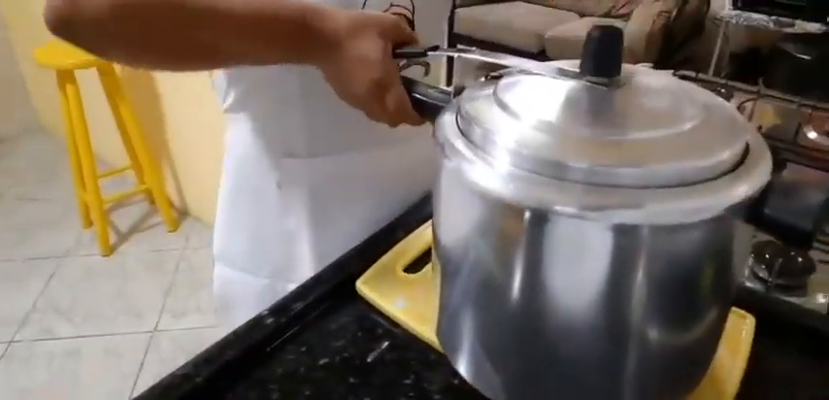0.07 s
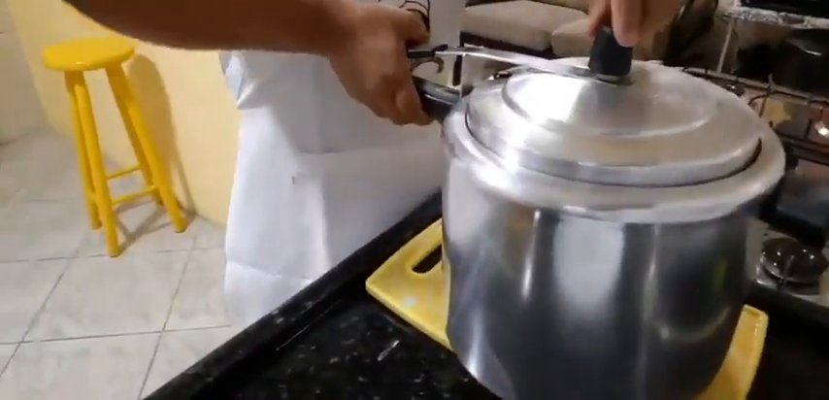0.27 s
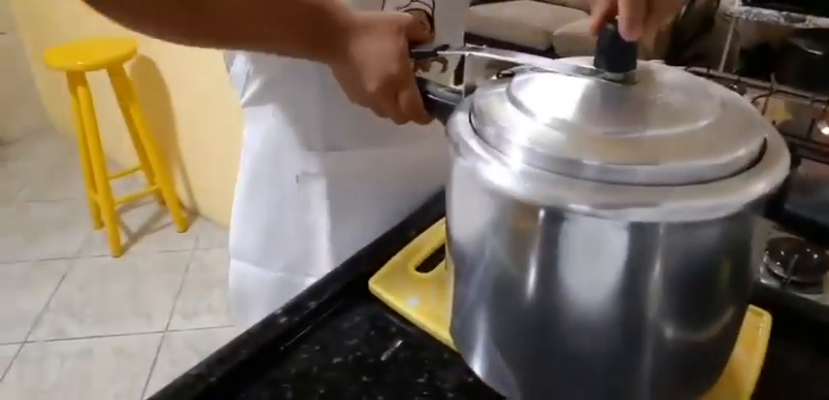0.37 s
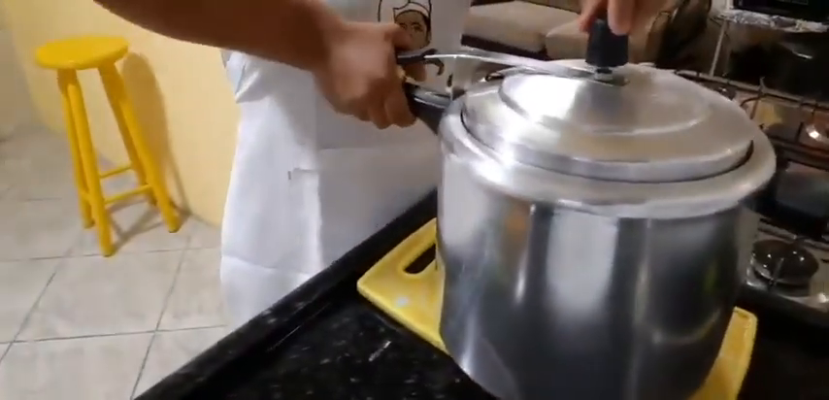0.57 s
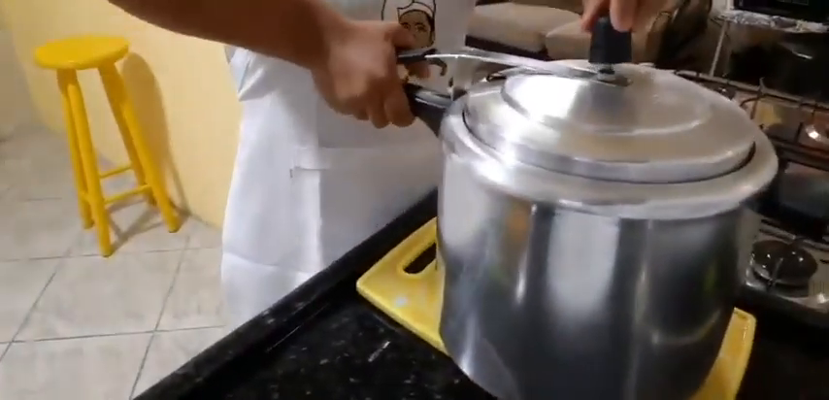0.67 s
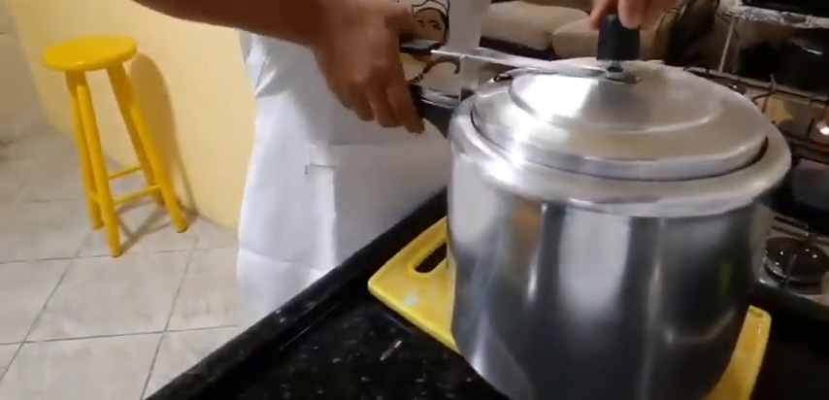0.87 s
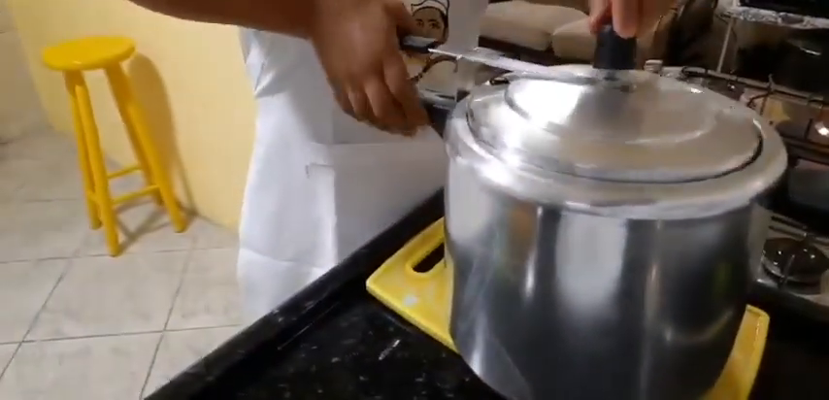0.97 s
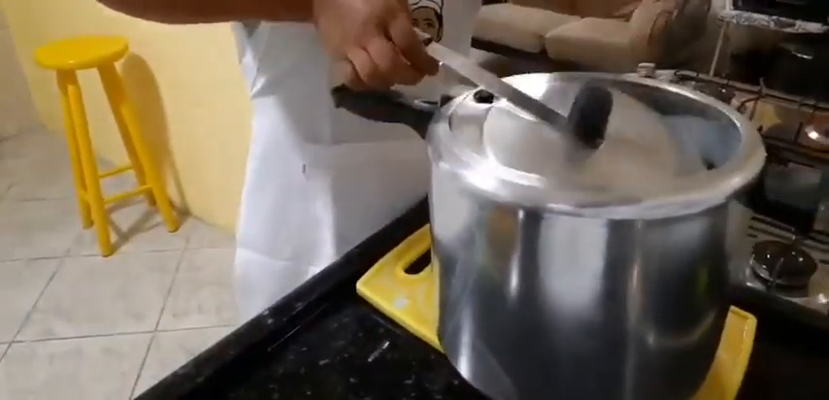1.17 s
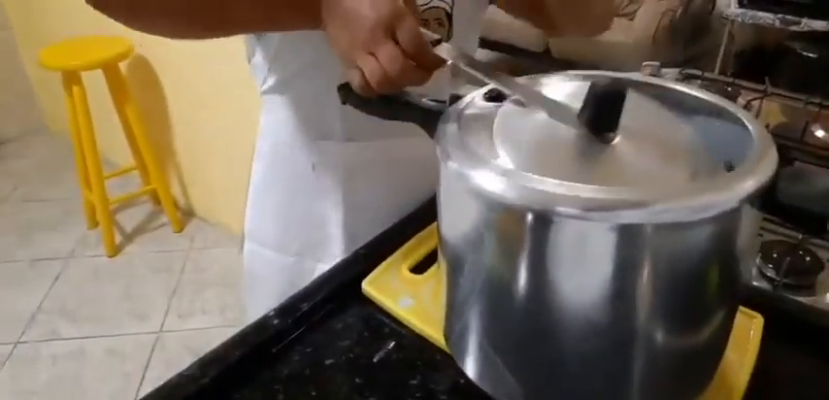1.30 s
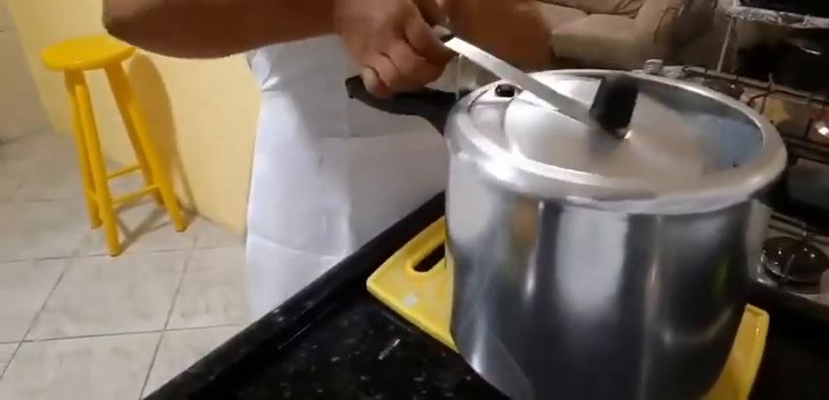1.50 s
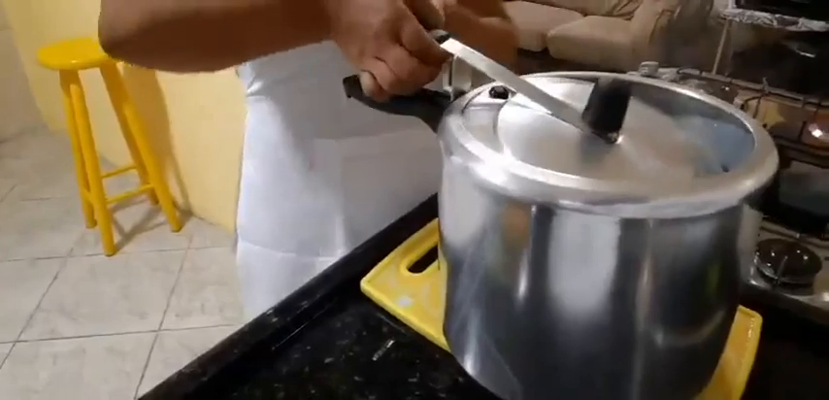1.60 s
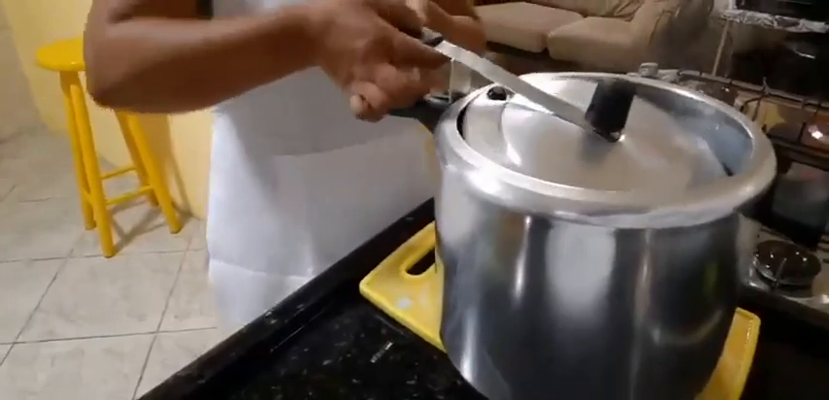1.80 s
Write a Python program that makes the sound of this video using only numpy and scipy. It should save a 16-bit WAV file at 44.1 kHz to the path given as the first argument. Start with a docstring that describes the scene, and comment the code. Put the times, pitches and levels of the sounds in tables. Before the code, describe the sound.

A metal pressure cooker lid rattles loose, scrapes and clanks against the pot.

```python
"""Over a faint rumble, the sprung lever of an aluminium pressure cooker rattles and snaps off its catch.
The rubber gasket ticks as it unsticks, and the freed lid scrapes round under the rim in tiny slips.
The lid then bumps the pot wall and drops against it with a clank. Each blow makes the metal ring
at its own natural pitches (its modes), and the tiled kitchen echoes after it."""
import sys
import numpy as np
from scipy import signal
from scipy.fft import rfft, irfft, next_fast_len
from scipy.io import wavfile

SR = 44100
rng = np.random.default_rng(int(sys.argv[2]) if len(sys.argv) > 2 else 0)


def file_out(sig):
    """Save sig as 16-bit WAV at sys.argv[1]."""
    # one column per channel
    cols = np.atleast_2d(sig).T
    # limit, then scale
    lim = np.clip(cols, -1, 1)
    pcm = np.round(lim * 32767).astype(np.int16)
    wavfile.write(sys.argv[1], SR, pcm)


N = 81585

# Table levels are relative. A fade time (t60) is how long a sound takes to drop by 60 dB.
# blows: (time [s], level [dB], bass [dB], treble [dB], rise time [s])
LEVER_KNOCKS = [(.036, -31, 11, -28, 0.0008), (.182, -22.5, 11, 3.5, 0.0067), (.192, -6, 5.5, -11, 0.0035),
                (.225, -12.5, 14, -10.5, 0.0013), (.247, -6.5, 6, -9, 0.0034), (.274, -4, 0.5, -9, 0.0048),
                (.3045, -1.5, 0, -5, 0.0045), (.318, -8, -10, 2, 0.0031), (.3315, 3.5, 3, -2, 0.0016),
                (.353, -10.5, 7, -23, 0.009), (.391, -5.5, -2, -22, 0.0084), (.486, -13, -12, -14, 0.0041),
                (.619, -17, -13.5, -18.5, 0.002), (.626, -24, -6, -20.5, 0.0026),
                (.773, -33.5, 1, -3, 0.0029)]
LID_CLANKS = [(1.164, -19.5, -2, -2, 0.0015), (1.226, -21.5, -4.5, -13, 0.0013),
              (1.254, -31.5, 6, -18, 0.001), (1.425, -10.5, 5, 6, 0.0082), (1.4405, -0.5, 5, 3, 0.0014),
              (1.4555, -0.5, -9, -7, .001), (1.493, -15, -23, 11.5, 0.0029), (1.510, -17, 20, -8, 0.0056),
              (1.558, -7.5, -7, -16.5, .003), (1.655, -22.5, 1.5, -17, 0.0037)]
WALL_BUMPS = [(1.324, -19, 0, 9.5, .006), (1.344, -10, 2.5, -7.5, 0.0089), (1.385, -21, 2, -23, 0.01)]
# rubber unsticking: (time [s], level [dB], pitch [Hz], fade time [s])
GASKET_TICKS = [(0.807, -47.5, 378, 0.14), (0.849, -36.5, 317, 0.053), (0.896, -37.5, 1660, 0.024),
                (0.928, -35, 1620, .015), (.953, -36, 1610, 0.0053)]
# how hard the lid rubs under the rim: (time [s], level [dB])
RUBBING = [(.78, -100), (.84, -58.5), (.953, -61.5), (.965, -24), (.979, -18), (.992, -34), (1.042, -33.5),
           (1.053, -19.5), (1.068, -50), (1.145, -41.5), (1.168, -33), (1.21, -50.5), (1.25, -53),
           (1.275, -59), (1.34, -82), (1.40, -97)]
# the metal's strong modes: (pitch [Hz], level [dB], fade time [s])
SHUT_POT_MODES = [(293, -27, .28), (345, -29, .2), (1378, -35, .5), (1545, -35, .45), (2040, -41, .45),
                  (2347, -42, .35), (5080, -37, .3), (5830, -44, .3), (6210, -43, .3), (7600, -47, .22),
                  (1341, -30, .48), (1997, -31, .45), (2905, -34, .38), (3284, -32, .45), (4453, -31, .42),
                  (4975, -30, .32)]
SCRAPE_MODES = [(127, -10, 0.84), (519.6, -9.5, 0.073), (658, -17, 0.26), (1355, -7.5, 0.33),
                (1516, -16, 0.15), (1752, -17, 0.067), (1993, -7.5, 0.64), (2930, -3, 0.15),
                (3690, 5.5, 0.05), (3790, -6, 0.073), (4270, 2, 0.071), (5130, -8, 0.11), (6030, -31, 0.31)]
LOOSE_LID_MODES = [(245, -24, .12), (279, -24, .28), (1280, -34, .3), (2036, -37, .4), (3225, -36, .36),
                   (3945, -36, .3), (4200, -39, .3), (4400, -37, .3), (6690, -43, .3), (7230, -44, .3),
                   (1850, -33, .45), (2685, -21, .6), (2733, -28, .52), (2827, -34, .45), (3640, -33, .42),
                   (3681, -33, .35), (5290, -29, .33)]
WALL_MODES = [(482.4, -19, .25), (614.5, -35.5, 0.73), (1125, -56, 0.25), (1346, -24, 0.38),
              (1560, -37, 0.21)]
# its crowded modes, which blur into noise: (frequency [Hz], level [dB])
SHUT_POT_SPECTRUM = [(30, -18), (100, -3), (220, -2.5), (310, 2.5), (450, 1), (640, 6), (900, 0),
                     (1050, -1.5), (1300, 4.5), (1750, 0.5), (3200, 2), (5500, -6.5), (8500, -14.5),
                     (11500, -11.5), (16000, -25.5)]
SCRAPE_SPECTRUM = [(30, -16.5), (120, -3), (210, 5), (350, 3.5), (520, 0.5), (700, -5), (850, -8),
                   (1060, -31), (1350, 1.5), (2400, 3.5), (4000, 0), (7500, -2), (8600, -2), (10500, -0.5),
                   (16000, -5)]
LOOSE_LID_SPECTRUM = [(30, -10), (100, -7.5), (180, 0.5), (280, -11.5), (370, 0.5), (650, 5), (1020, -1.5),
                      (1300, 6.5), (2300, 2), (3800, 3.5), (7000, -6), (9000, -8.5), (16000, -17.5)]
WALL_SPECTRUM = [(30, -21), (140, 9), (330, 2.5), (600, 7.5), (950, 0), (1400, 6), (2000, 4.5), (5000, -3),
                 (9000, -12), (16000, -17)]
# background noise: (frequency [Hz], level [dB])
RUMBLE_SPECTRUM = [(25, -20), (55, 5.5), (85, -11), (120, 2), (170, -13), (300, -13.5), (650, -14.5),
                   (1000, -27.5), (2000, -18.5), (5000, -26.5), (8000, -39.5), (16000, -30)]
# the kitchen's echo: (frequency [Hz], fade time [s])
ROOM_T60 = [(60, 0.55), (200, 0.69), (1000, 0.45), (3000, 0.44), (8000, 0.44), (16000, 0.4)]
# how alike left and right sound: (frequency [Hz], likeness [0 to 1])
ROOM_LIKENESS = [(60, 1), (280, 0.71), (600, 0.38), (1500, 0.3), (4000, 0.22), (16000, 0.2)]

BASS_HZ, TREBLE_HZ = 594, 3240
TWIN_GAP_HZ, TWIN_GAIN = 12.97, 0.72   # each mode's gap is this times a random factor
PEAK_DB, PEAK_WIDTH = 8, 0.021   # lift round each mode; half-width as a share of its pitch
CRASH_DB, CRASH_T60_S = -17, .09
CRACK_OVER_CRASH_DB, CRACK_T60_S = 10.5, .022
SLIPS_PER_S, SLIP_SPREAD_DB, SCRAPE_RING_DB = 3500, 4, -19.5
ROOM_GAP_S, LEFT_LAG_S = 0.0046, .00016
PAN_DB, PAN_ABOVE_HZ = 0.95, 160   # the lean to the left fades in the bass
RUMBLE_DB, CUTOFF_HZ = -59, 15800
TIME = np.arange(N) / SR
FFT_SIZE = next_fast_len(2 * N, real=True)
HZ = np.maximum(np.arange(FFT_SIZE // 2 + 1) * SR / FFT_SIZE, 1)


def from_db(db):
    """Turn decibels into a gain."""
    return 10 ** (np.asarray(db) / 20)


def rms_one(x):
    """Scale a sound to an average (rms) level of one."""
    return x / np.sqrt(np.mean(x ** 2) + 1e-20)


def at_hz(points, hz):
    """Read between a table's rows on a log-frequency axis."""
    freqs, values = np.transpose(points)
    return np.interp(np.log(hz), np.log(freqs), values)


def colour(x, curve_db):
    """Turn each frequency up or down without smearing sound back in time (minimum phase)."""
    cepstrum = irfft(np.log(from_db(curve_db)), FFT_SIZE)
    cepstrum[1:FFT_SIZE // 2] *= 2
    cepstrum[FFT_SIZE // 2 + 1:] = 0
    return irfft(rfft(x, FFT_SIZE) * np.exp(rfft(cepstrum)), FFT_SIZE)[..., :N]


def dying(t60):
    """A fade that drops 60 dB in t60 seconds."""
    return np.exp(-np.log(1000) * TIME / t60)


def delayed(x, start_s):
    """Start a sound later."""
    start = int(np.clip(start_s * SR, 0, N - 1))
    silence = np.zeros(x.shape[:-1] + (start,))
    return np.concatenate([silence, x[..., :N - start]], axis=-1)


def room_noise():
    """Stereo noise whose sides are alike in the bass and mostly unrelated in the treble."""
    mid, side = rfft(rng.standard_normal((2, FFT_SIZE)))
    alike = np.clip(at_hz(ROOM_LIKENESS, HZ), -.99, .99)
    shared = np.sqrt((1 + alike) / 2) * mid
    opposed = np.sqrt((1 - alike) / 2) * side * [[1], [-1]]
    return irfft(shared + opposed, FFT_SIZE)[:, :N]


def rumble():
    """Faint, steady background noise, strongest in the bass."""
    return from_db(RUMBLE_DB) * rms_one(colour(room_noise(), at_hz(RUMBLE_SPECTRUM, HZ)))


def ringing(hz, t60):
    """A mode and its slightly higher twin drift in and out of step, so the ring wobbles."""
    main = np.sin(2 * np.pi * hz * (TIME - np.array([[LEFT_LAG_S], [0]])))
    side_phase = np.arccos(at_hz(ROOM_LIKENESS, hz)) / 2 * np.array([[1], [-1]])
    twin_hz = hz + TWIN_GAP_HZ * rng.uniform(0.804, 1.31)
    twin = np.sin(2 * np.pi * twin_hz * TIME + side_phase)
    return (main + TWIN_GAIN * twin) * dying(t60)


def metal_db(spectrum, modes):
    """The metal's tone: a broad spectrum with a peak at each mode."""
    peaks = [1 / (1 + ((HZ / hz - 1) / PEAK_WIDTH) ** 2) for hz, _, _ in modes]
    return at_hz(spectrum, HZ) + PEAK_DB * np.max(peaks, axis=0)


def contact_db(hz, bass_db, treble_db):
    """A heavy contact brings out the bass, a hard one the treble."""
    return bass_db / (1 + (hz / BASS_HZ) ** 4) + treble_db / (1 + (TREBLE_HZ / hz) ** 2)


def blows(hits, modes, spectrum, room, room_db, ring_db):
    """Struck metal gives a crack, a short crash and a long ring; a grazing blow swells slowly."""
    fade = dying(CRASH_T60_S) + from_db(CRACK_OVER_CRASH_DB) * dying(CRACK_T60_S)
    rings = np.array([ringing(hz, t60) for hz, _, t60 in modes])
    mode_hz, mode_db, _ = np.transpose(modes)
    body_db = metal_db(spectrum, modes)
    crash, ring = 0, 0
    for start_s, db, bass_db, treble_db, rise_s in hits:
        swell = from_db(db) * (1 - np.exp(-TIME / rise_s))
        burst = rng.standard_normal(N) * swell * fade
        burst = colour(burst, body_db + contact_db(HZ, bass_db, treble_db))
        crash += delayed(from_db(CRASH_DB) * burst, start_s)
        strengths = from_db(ring_db + mode_db + contact_db(mode_hz, bass_db, treble_db))
        ring += delayed(swell * np.tensordot(strengths, rings, axes=1), start_s)
    return in_room(crash, room, room_db) + ring


def lever_knocks(room):
    """The sprung lever knocks on the shut cooker and sets it ringing."""
    return blows(LEVER_KNOCKS, SHUT_POT_MODES, SHUT_POT_SPECTRUM, room, room_db=-0.5, ring_db=-3)


def kitchen_echo():
    """The tiled room's answer to a click: noise in which each octave fades at its own rate."""
    noise, tail = rfft(room_noise(), FFT_SIZE), 0
    octaves_hz = np.geomspace(60, 15360, 9)
    for hz, band in zip(octaves_hz, np.eye(len(octaves_hz))):
        band_gain = np.interp(np.log(HZ), np.log(octaves_hz), band)
        tail += irfft(noise * band_gain, FFT_SIZE)[:, :N] * dying(at_hz(ROOM_T60, hz))
    return delayed(tail / np.sqrt(np.sum(tail ** 2) / 2), ROOM_GAP_S)


def in_room(x, room, room_db):
    """The direct sound reaches the left side a little late; the echo follows."""
    direct = np.array([delayed(x, LEFT_LAG_S), x])
    echo = signal.fftconvolve(room, x[None], axes=1)[:, :N]
    return direct + from_db(room_db) * echo


def gasket_ticks(room):
    """Rubber lets go of metal in short ticks that die quickly."""
    ticks = 0
    for start_s, db, hz, t60 in GASKET_TICKS:
        tick = from_db(db) * np.sin(2 * np.pi * hz * TIME) * dying(t60)
        ticks += delayed(tick, start_s)
    return in_room(ticks, room, room_db=-2)


def lid_scrape(room):
    """Many tiny slips of the lid's edge on the rim hiss and keep some modes ringing."""
    slips = (rng.random(N) < SLIPS_PER_S / SR) * rng.choice([-1, 1], N)
    slip_sizes = from_db(SLIP_SPREAD_DB * np.minimum(rng.exponential(1, N), 4))
    pressure = from_db(np.interp(TIME, *np.transpose(RUBBING)))
    hiss = colour(rms_one(slips * slip_sizes) * pressure, metal_db(SCRAPE_SPECTRUM, SCRAPE_MODES))
    body = 0
    for hz, db, t60 in SCRAPE_MODES:
        build_up = np.sqrt(t60 * SR / (4 * np.log(1000)))   # divided out so long rings are no louder
        body += from_db(db + SCRAPE_RING_DB) * ringing(hz, t60) / build_up
    ring = signal.fftconvolve(body, hiss[None], axes=1)[:, :N]
    return in_room(hiss, room, room_db=0.5) + ring


def lid_clanks(room):
    """The loose lid strikes the pot, metal on metal."""
    return blows(LID_CLANKS, LOOSE_LID_MODES, LOOSE_LID_SPECTRUM, room, room_db=-0.7, ring_db=-2.5)


def wall_bumps(room):
    """The lid's soft gasket bumps the pot wall, which rings low."""
    return blows(WALL_BUMPS, WALL_MODES, WALL_SPECTRUM, room, room_db=2.5, ring_db=-1.5)


def scene():
    """The cooker, a little louder on the left, over the quiet of the kitchen."""
    room = kitchen_echo()
    background = rumble()
    cooker = lever_knocks(room) + gasket_ticks(room) + lid_scrape(room)
    left, right = cooker + lid_clanks(room) + wall_bumps(room)
    lean_db = PAN_DB / (1 + (PAN_ABOVE_HZ / HZ) ** 2)
    return np.array([colour(left, lean_db), colour(right, -lean_db)]) + background


def record(dry):
    """Round off the loudest peaks and cut the highest treble."""
    low_pass = signal.ellip(10, .2, 80, CUTOFF_HZ, fs=SR, output="sos")
    return signal.sosfilt(low_pass, np.tanh(dry))


dry = scene()
out = record(dry)
file_out(out)
```